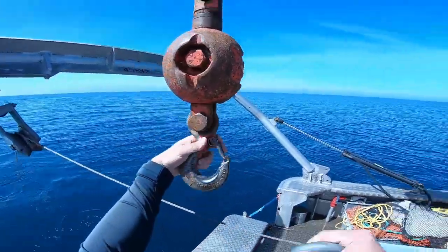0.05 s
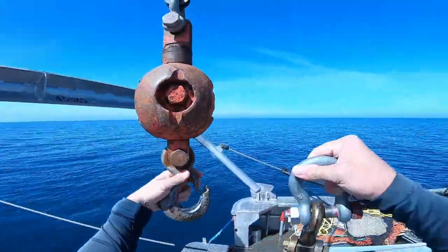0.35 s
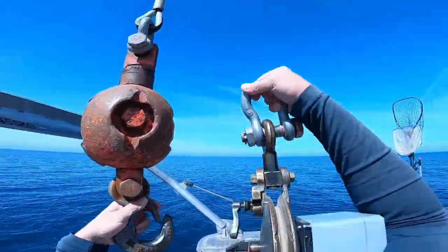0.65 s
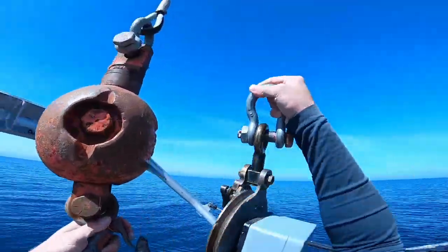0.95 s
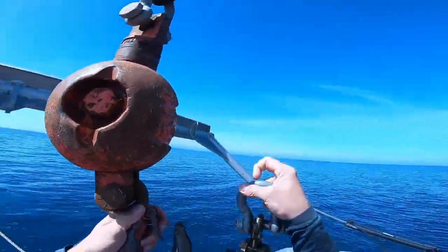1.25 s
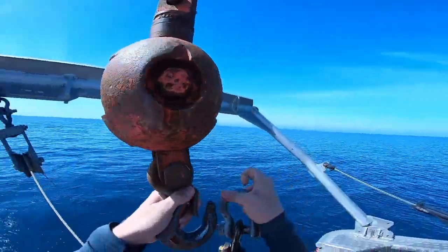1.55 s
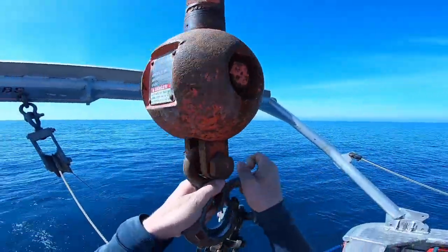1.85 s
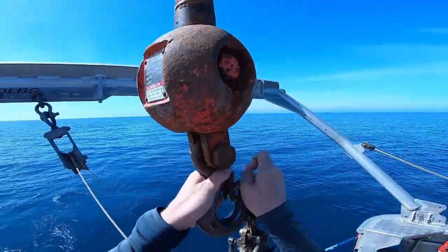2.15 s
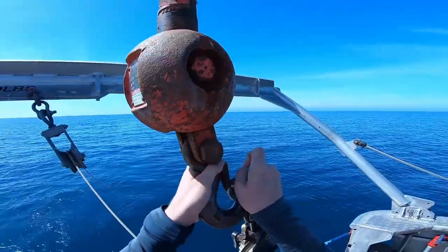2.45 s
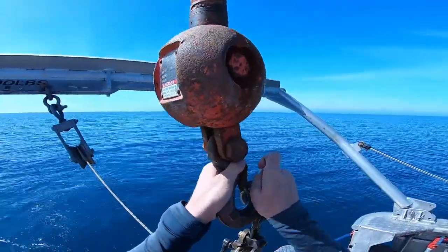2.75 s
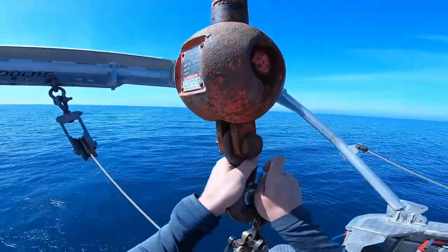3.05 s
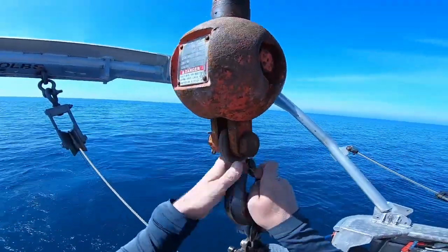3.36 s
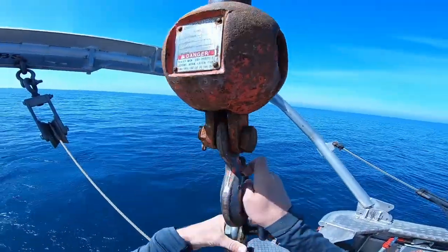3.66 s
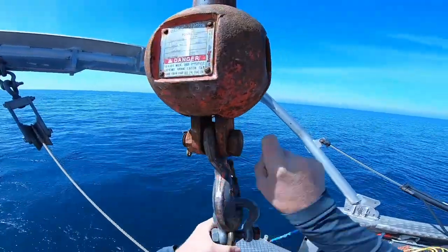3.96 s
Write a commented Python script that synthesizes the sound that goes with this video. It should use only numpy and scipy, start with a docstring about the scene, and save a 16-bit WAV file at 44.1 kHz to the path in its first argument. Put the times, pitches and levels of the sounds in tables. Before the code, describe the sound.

A steel shackle clacks against a crane hook close by, each hit ringing briefly. Faint clinks lead to a sharp clank at 1.2 seconds and a busy cluster from 1.6 to 2.2. The latch snaps brightly at 2.3. Softer knocks, a short scrape and latch clicks follow from 3 to 3.3, and the shackle lands with a crack near 4. A boat's diesel drone and sea wash continue throughout.

```python
"""Shackle and crane hook on deck

A steel shackle is worked onto a boat's crane hook, an arm's length away. Each contact chatters for a
few milliseconds and rings hook and shackle, both damped by the hands; steel grinds and the latch snaps.
Underneath, a diesel drones at steady speed, a slower engine throbs and the sea washes along the hull."""
import sys
import numpy as np
from scipy import signal
from scipy.fft import rfft, irfft
from scipy.io import wavfile
from scipy.ndimage import uniform_filter1d

SR = 44100
rng = np.random.default_rng(int(sys.argv[2]) if len(sys.argv) > 2 else 0)


def to_wav(s):
    """Save 16-bit WAV."""
    ch = np.atleast_2d(s).T  # columns
    pcm = np.round(np.clip(ch, -1, 1) * 32767)  # PCM
    wavfile.write(sys.argv[1], SR, pcm.astype(np.int16))


N = 176400
SIDES = np.array([[1], [-1]])  # left, right


def undb(db):
    """Decibels to gain."""
    return 10 ** (np.asarray(db) / 20)


def at(table, hz):
    """Read a table on a log-frequency axis."""
    freqs, values = np.array(table).T
    return np.interp(np.log(np.maximum(hz, 1)), np.log(freqs), values)


def curve(table):
    """Read an automation curve at every sample."""
    return np.interp(np.arange(N) / SR, *np.array(table).T)


def pan(db):
    """Stereo gains for a pan given as left minus right in dB."""
    return undb(SIDES * db / 2)


def walk(rate_hz):
    """Smooth random modulation with a spread of 1."""
    hz = np.fft.rfftfreq(N, 1 / SR)
    drift = irfft(rfft(rng.standard_normal(N)) / (1 + (hz / rate_hz) ** 4) * (hz > 0), N)
    return drift / drift.std()


def colour(x, table, tilt_db=0, size=1024):
    """Minimum-phase EQ with the table's spectrum, tilted by tilt_db per octave; unit power gain."""
    hz = np.fft.rfftfreq(size, 1 / SR)
    db = at(table, hz)
    gain = undb(db + tilt_db * np.log2(np.maximum(hz, hz[1]) / hz[db.argmax()]))
    cepstrum = irfft(np.log(gain / np.sqrt(np.mean(gain ** 2))))
    cepstrum[1:size // 2] *= 2
    cepstrum[size // 2 + 1:] = 0
    return signal.fftconvolve(x, irfft(np.exp(rfft(cepstrum)))[None], axes=1)


def add(out, start, x):
    """Mix a stereo sound in at its start time."""
    i = int(start * SR)
    out[:, i:i + x.shape[1]] += x[:, :N - i]


# tone of hull rumble and sea (frequency [Hz], level [dB per Hz])
WASH_SPECTRUM = [(12, -6.5), (28, 1.5), (42, 6.5), (72, 3.5), (100, -2), (135, 0.5), (160, -5), (260, -9.5),
                 (400, -16.5), (650, -18.5), (1000, -17.5), (1600, -28.5), (2500, -29.5), (3150, -36),
                 (3550, -32), (3850, -39.5), (4300, -41), (7300, -37), (8600, -47.5), (11000, -60),
                 (14000, -77.5)]
# fader ride on the treble wash (time [s], level [dB])
HISS_RIDE = [(0, 0), (.4, 1.5), (1., 0.5), (1.5, -2), (2.2, 0), (2.8, 1), (3.4, 0.5), (4, -2)]
# placement of the bed of sea and diesel (frequency [Hz], pan [dB])
BED_PAN = [(60, -2), (170, -1), (300, -3), (510, -4.5), (870, -6.5), (2500, -8.5), (4300, -3), (7300, -3)]
# how alike the bed's two sides are (frequency [Hz], correlation [-1 to 1])
BED_LIKENESS = [(25, 0.71), (60, 0.27), (100, 1), (240, 0.88), (470, 0.69), (930, -0.24), (3700, 0.23),
                (7300, -0.43)]

def wash(level_db=-29.5, swell_db=0.82, flicker_db=2):
    """Hull rumble and sea: octave bands that swell together and flicker alone, louder on the right."""
    hz = np.fft.rfftfreq(N, 1 / SR)
    likeness = np.clip(at(BED_LIKENESS, hz), -.99, .99)
    mid, side = rfft(rng.standard_normal((2, N)))
    spectrum = np.sqrt(1 + likeness) * mid + SIDES * np.sqrt(1 - likeness) * side
    spectrum *= undb(at(WASH_SPECTRUM, hz)) * pan(at(BED_PAN, hz))
    octave = np.log2(np.clip(hz / 30, 1, 512))
    swell = swell_db * walk(rate_hz=1.6)
    hiss = curve(HISS_RIDE)
    out = 0
    for k in range(10):
        band = irfft(spectrum * np.maximum(1 - abs(octave - k), 0), N)
        treble = np.clip((k - 5) / 2, 0, 1)
        out += band * undb(swell + flicker_db * walk(rate_hz=22.7) + treble * hiss)
    return undb(level_db) * out / out.std()


SHAFT_HZ = 29.933
# faint partials at multiples of the four-stroke cycle (frequency [Hz], level [dB per partial])
CLATTER_SPECTRUM = [(150, -59), (300, -56), (400, -60), (700, -63), (1050, -63), (1500, -70), (2400, -81)]

def clatter(turns, scatter_db=4, size=4096, count=160):
    """Valve and piston noise that repeats every two turns of the shaft, different at each ear."""
    hz = np.arange(count) * SHAFT_HZ / 2
    db = at(CLATTER_SPECTRUM, hz) + scatter_db * rng.standard_normal(count)
    gain = undb(db) * pan(at(BED_PAN, hz)) * (hz >= CLATTER_SPECTRUM[0][0])
    width = np.clip(1 - at(BED_LIKENESS, hz), 0, 1)
    phase = 2 * np.pi * (rng.random(count) + width * rng.random((2, count)))
    cycle = irfft(gain * np.exp(1j * phase), size) * size / 2
    return np.array([np.interp(turns / 2, np.arange(size) / size, side, period=1) for side in cycle])


# the diesel's partials (order [multiple of shaft speed], level [dB])
DIESEL_ORDERS = [(2, 0.75), (2.5, -10), (3, -21.5), (3.5, -17.5), (4, -5), (4.5, -19), (5.5, -23.5),
                 (6, -16.5), (7, -24), (8, -20), (9, -30), (11, -25), (14, -39), (17.5, -33), (21.5, -34.5),
                 (24, -32.5), (28, -39)]
# fader ride on its upper partials (time [s], level [dB])
UPPER_RIDE = [(0, 0.5), (1.2, -1), (1.8, 3), (2.7, 1.5), (4, 1)]
# one partial hums louder as the hook comes near (time [s], level [dB])
HUM_RIDE = [(0, -51), (.6, -48.5), (1.2, -48), (1.7, -44), (2.3, -41), (2.8, -40.5), (3.3, -44), (4, -42.5)]

def diesel(level_db=-24.5, speed_wander=0.0012, hum_order=12):
    """A governed diesel firing twice a turn; each partial flutters, the upper ones more."""
    turns = np.cumsum(SHAFT_HZ * (1 + speed_wander * walk(rate_hz=3.84))) / SR
    upper_gain = undb(curve(UPPER_RIDE))
    out = clatter(turns)
    for order, db in DIESEL_ORDERS:
        gain, flutter = (upper_gain, 0.42) if order > 5 else (1, 0.081)
        partial = np.sin(2 * np.pi * (order * turns + rng.random())) * (1 + flutter * walk(rate_hz=7.2))
        out += undb(level_db + db) * gain * partial * pan(at(BED_PAN, order * SHAFT_HZ))
    hum = np.sin(2 * np.pi * hum_order * turns) * (1 + 0.21 * walk(rate_hz=9.8))
    out += undb(curve(HUM_RIDE)) * hum * pan(at(BED_PAN, hum_order * SHAFT_HZ))
    return np.sqrt(2) * out  # sine levels are RMS


# the slow engine's partials (frequency [Hz], level [dB])
THROB_PARTIALS = [(26.4, -33), (66, -36), (79.2, -38.5), (92.4, -36.5), (110, -44), (145.2, -45.5)]

def slow_engine(flutter=0.15, pan_db=-1):
    """A slower engine throbs: low partials, each gently wavering in level."""
    t = np.arange(N) / SR
    out = 0
    for hz, db in THROB_PARTIALS:
        partial = np.sin(2 * np.pi * (hz * t + rng.random()))
        out += undb(db) * partial * (1 + flutter * walk(rate_hz=1.1))
    return np.sqrt(2) * out * pan(pan_db)


def deck(x, t60_s=0.11, delay_s=.005, size=12000):
    """Short scattered reflections from deck and crane."""
    t = np.arange(size) / SR
    onset = np.clip(t / delay_s - .5, 0, 1)
    echoes = rng.standard_normal((2, size)) * np.exp(-np.log(1000) * t / t60_s) * onset
    echoes /= np.sqrt(np.sum(echoes ** 2) / 2)
    return signal.fftconvolve(x, echoes, axes=1)[:, :N]


def chatter(decay_ms, attack_s=0.00041, width=0.41, size=4096):
    """A dying burst of tiny contacts with an even spectrum, slightly different at each ear."""
    t = np.arange(size) / SR
    envelope = np.exp(-t * 1000 / decay_ms) * (1 - np.exp(-t / attack_s))
    spectrum = rfft(envelope * rng.standard_normal((2, size)))
    contour = np.sqrt(uniform_filter1d(abs(spectrum) ** 2, size=60, axis=1))
    mid, side = irfft(spectrum / contour) * envelope ** .2  # flatten the tone, tighten the tail
    burst = mid + width * side * SIDES
    return burst * np.sqrt(np.sum(envelope ** 2) / np.sum(burst ** 2) * 2)


def ring(modes, pitch=1, scatter_db=1, detune=.005, attack_s=0.0016, size=12000):
    """Decaying modes; every blow lands on a different spot and the grip shifts each mode a little."""
    t = np.arange(size) / SR
    hz, db, t60 = np.array(modes).T[:, :, None]
    gain = undb(db + scatter_db * rng.standard_normal(hz.shape))
    hz = pitch * hz * (1 + detune * rng.standard_normal(hz.shape))
    attack = np.sin(np.pi / 2 * np.minimum(t / attack_s, 1)) ** 2
    return attack * (gain * np.sin(2 * np.pi * hz * t) * np.exp(-np.log(1000) * t / t60)).sum(0)


# the grind follows the shackle's pressure on the hook (time [s], level [dB])
SCRAPE_PRESSURE = [(3.0, -66), (3.015, -44), (3.035, -56), (3.085, -49), (3.103, -38), (3.135, -43),
                   (3.165, -50), (3.195, -55), (3.225, -39), (3.25, -43), (3.27, -63)]
# resonances of the grind (frequency [Hz], level [dB], T60 [s])
SCRAPE_MODES = [(1340, 0, 0.018), (1740, -6, .012), (2170, -1, 0.018), (2550, -2, 0.016), (3380, -1, 0.015),
                (4030, -6, 0.018), (6640, -6, 0.0091)]

def scrape(slips_per_s=220, count=120):
    """Steel sticks and slips on rusty steel: uneven tiny contacts, each ringing its own mix of modes."""
    out = np.zeros((2, N))
    times, levels = np.array(SCRAPE_PRESSURE).T
    for start in times[0] + np.cumsum(rng.exponential(size=count)) / slips_per_s:
        slip = ring(SCRAPE_MODES, scatter_db=4, detune=0.036, size=2048)
        if start < times[-1]:
            add(out, start, pan(0) * undb(np.interp(start, times, levels)) * slip)
    return out


# latch cues (time [s], snap [dB], chatter decay [ms], tilt [dB per octave], latch ring [dB],
# spring pitch [Hz], spring [dB])
LATCH_SNAPS = [(2.3352, -10.5, 1.59, 1.5, -44, 13300, -38), (3.2390, -26, 2.3, -3, -41, 9500, -48),
               (3.2505, -34, 3.7, -4, -43, 12700, -62), (3.2565, -22, 1.7, 8, -31.5, 14100, -40)]
# tone of the snap (frequency [Hz], level [dB per Hz])
SNAP_SPECTRUM = [(400, -34), (1500, -19), (2400, 1), (4100, -3.5), (5200, -0.5), (6600, 1), (7700, 1.5),
                 (8400, -17), (9700, -11.5), (11500, -26), (13300, -18), (15500, -42)]
# the latch's ping (frequency [Hz], level [dB], T60 [s])
LATCH_MODES = [(4110, 9, 0.022), (5460, -16, .05), (7300, -2, 0.067), (7870, -10, .07), (10620, -20, 0.067)]

def latch(spring_t60_s=0.017, snap_send_db=-14, spring_send_db=-8):
    """The hook's sprung latch snaps, short and bright; the latch pings and its spring zings."""
    snaps, spring = np.zeros((2, 2, N))
    for start, db, decay_ms, tilt_db, ring_db, spring_hz, spring_db in LATCH_SNAPS:
        add(snaps, start, undb(db) * colour(chatter(decay_ms), SNAP_SPECTRUM, tilt_db))
        add(snaps, start, pan(0) * undb(ring_db) * ring(LATCH_MODES))
        add(spring, start, pan(0) * ring([(spring_hz, spring_db, spring_t60_s)]))
    return snaps + spring + deck(undb(snap_send_db) * snaps + undb(spring_send_db) * spring)


# tone of the crack as the shackle lands (frequency [Hz], level [dB per Hz])
LANDING_SPECTRUM = [(400, -9), (1000, 0), (2100, 3), (2900, -1), (4200, 6), (5600, -1.5), (6700, -2.5),
                    (7700, -6), (8600, -19), (10500, -31), (11800, -42), (13000, -39), (15000, -68)]
# ring of the landing (frequency [Hz], level [dB], T60 [s])
LANDING_MODES = [(603, -9, 0.03), (794, -12, 0.077), (1050, -12, 0.033), (1380, -15, 0.056),
                 (1785, -10.5, 0.076), (2140, -1.5, 0.027), (3584, 4, 0.018), (4200, -16.5, 0.12),
                 (4420, 7.5, 0.01), (5200, -14, .015)]

def landing(start_s=3.9726, crack_db=-13.5, ring_db=-15.5, pan_db=-6):
    """The shackle drops into the bowl of the hook with a crack and a short ring."""
    out = np.zeros((2, N))
    add(out, start_s, undb(crack_db) * colour(chatter(decay_ms=3.9), LANDING_SPECTRUM))
    add(out, start_s, pan(pan_db) * undb(ring_db) * ring(LANDING_MODES))
    return out


# steel-on-steel hits (time [s], clack [dB], chatter decay [ms], tilt [dB per octave], hook knock [dB],
# knock pitch [ratio], shackle ring [dB], hook ring [dB], pan [dB])
STEEL_HITS = [(.197, -36.5, 2.6, 2.5, -55, 1.1, -51, -52, -8), (0.928, -33, 2.8, -3, -43, 1, -58, -57, -4),
              (1.151, -20.5, 5.6, 1.5, -12.5, 1.077, -34, -37, 4),
              (1.1646, -19.5, 2.8, -1, -15.5, 1.06, -29, -50, -2),
              (1.615, -29, 3.8, 3, -14.5, 0.95, -42, -60, 0.5),
              (1.6246, -23, 2.6, 3, -5, 0.98, -46, -32.5, 1),
              (1.6441, -21.5, 1.7, 3, -6, 0.98, -35, -35.5, 1),
              (1.695, -25, 4.2, -8, -54, 0.49, -66, -60, 3),
              (1.7306, -20, 4.7, -4.5, -8, 1.07, -45, -54, -2),
              (1.757, -28.5, 1.5, 1, -41, 0.84, -51, -58, -2),
              (1.9547, -32, 1.8, -6, -18, 0.95, -52, -63, 0), (1.9804, -22, 3, -1, -35, 1.1, -26, -61, 0),
              (2.0515, -22.5, 5.5, -2, -18.5, 1.3, -51, -60, -1.2),
              (2.0968, -36, 2.7, -6, -25.5, 1, -60, -71, 2),
              (2.1509, -20.5, 5.4, -2, -21, 0.69, -20, -56, 2),
              (2.1565, -21, 1.5, -0.5, -14, 0.91, -26, -30.5, 5.5),
              (2.1854, -22, 1.6, -4, -13, .86, -54, -63, 3),
              (2.649, -34.5, 3.5, -4.5, -31.5, 1.06, -57, -60, -3),
              (3.008, -27.5, 4.3, -7, -26.5, 0.63, -56, -58, -1),
              (3.099, -30, 5.5, -7.5, -28.5, 0.61, -66, -52, -2),
              (3.107, -35.5, 2, 10, -27, 1.005, -58, -60, 0),
              (3.153, -35.5, 3.5, -2, -34, 2.18, -57, -64, -2),
              (3.6446, -38, 3.3, 6.5, -49, 0.94, -57, -58, -2),
              (3.874, -33.5, 5.1, -6, -45, 1.1, -64, -58, -2)]
# tone of the clack (frequency [Hz], level [dB per Hz])
CLACK_SPECTRUM = [(250, -13.5), (750, -1.5), (1200, -1), (2000, 8), (3100, 7), (4200, 5), (5000, -8.5),
                  (6800, -1.5), (8300, -23.5), (10500, -38.5), (12500, -56)]
# the hook's tight knock, its longer ring and the shackle's ring (frequency [Hz], level [dB], T60 [s])
HOOK_KNOCK_MODES = [(1520, -22.5, 0.022), (3106, -2, 0.0069), (3310, 5, 0.0079), (3545, -17, 0.0074)]
HOOK_RING_MODES = [(4210, -5.5, 0.14), (4915, -12.5, 0.17), (5070, -4.5, 0.09), (5860, -6, 0.12),
                   (7080, -11.5, 0.071)]
SHACKLE_MODES = [(3565, -5.5, 0.048), (5670, 1, 0.054), (6620, -12.5, .035), (6990, -15, .06),
                 (9200, -37, .05), (10270, -47, .09)]
# dull knocks of the heavy tackle (time [s], pitch [Hz], level [dB])
DULL_KNOCKS = [(1.697, 810, -33.5), (1.733, 725, -51), (1.759, 680, -25), (1.982, 790, -39),
               (2.053, 683, -29), (2.153, 785, -27.5), (3.128, 1312, -32.5)]

def tackle(knock_t60_s=0.084, deck_send_db=-18.5):
    """Shackle strikes hook: clacks that ring both, dull knocks for weight, then the drop home."""
    out = np.zeros((2, N))
    for start, db, decay_ms, tilt_db, knock_db, pitch, shackle_db, ring_db, pan_db in STEEL_HITS:
        clack = undb(db) * colour(chatter(decay_ms), CLACK_SPECTRUM, tilt_db)
        hook_knock = undb(knock_db) * ring(HOOK_KNOCK_MODES, pitch)
        shackle_ring = undb(shackle_db) * ring(SHACKLE_MODES)
        hook_ring = undb(ring_db) * ring(HOOK_RING_MODES)
        add(out, start, pan(pan_db) * clack)
        add(out, start, pan(pan_db) * (hook_knock + shackle_ring + hook_ring))
    for start, hz, db in DULL_KNOCKS:
        add(out, start, pan(0) * ring([(hz, db, knock_t60_s)]))
    out += landing()
    return out + undb(deck_send_db) * deck(out)


def scene():
    """Close steel up front, over a bed of engines and sea."""
    return tackle() + latch() + diesel() + slow_engine() + wash() + scrape()


def record(dry, top_hz=15800):
    """A steep low-pass trims the very top of the mix."""
    return signal.sosfilt(signal.ellip(8, .2, 70, top_hz, fs=SR, output="sos"), dry)


dry = scene()
out = record(dry)
to_wav(out)
```